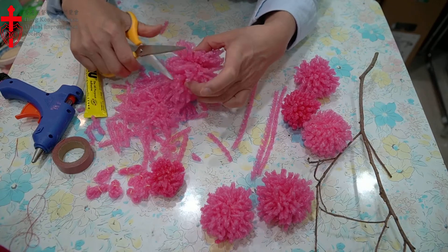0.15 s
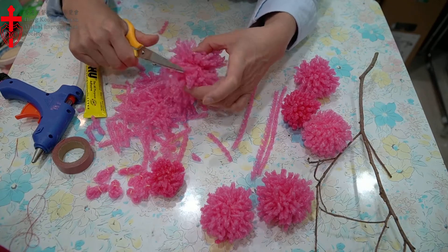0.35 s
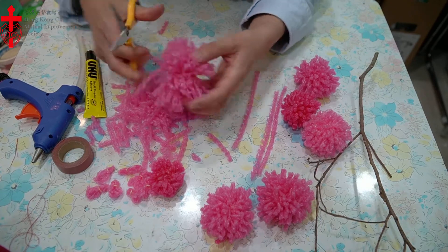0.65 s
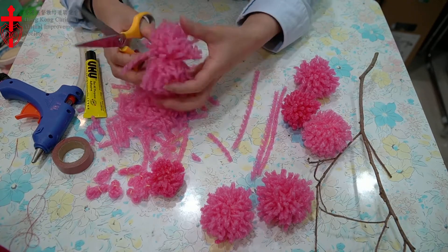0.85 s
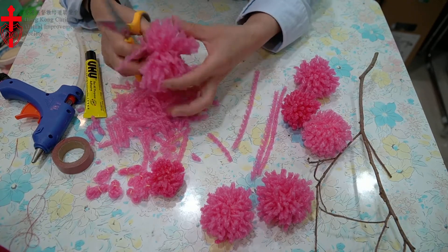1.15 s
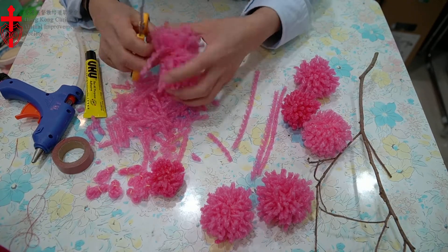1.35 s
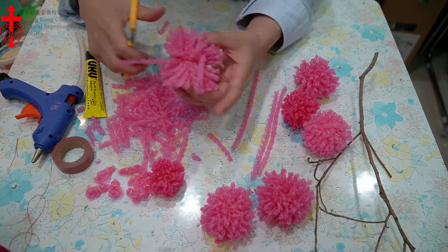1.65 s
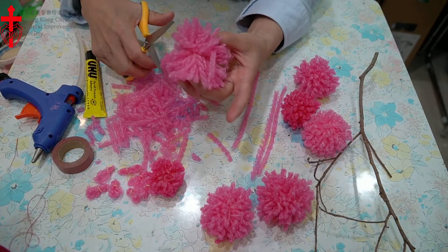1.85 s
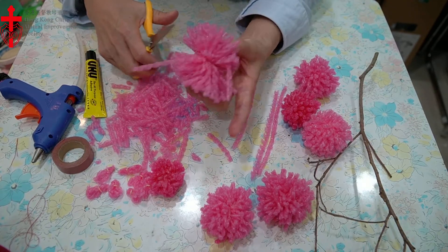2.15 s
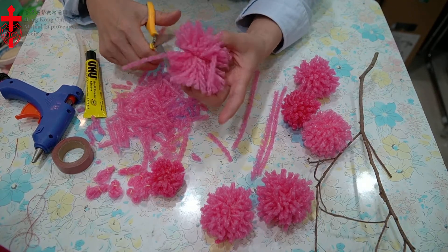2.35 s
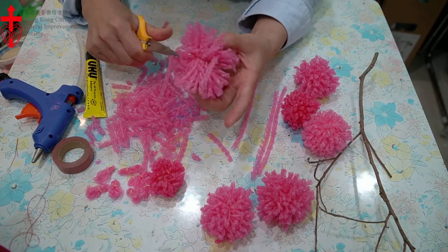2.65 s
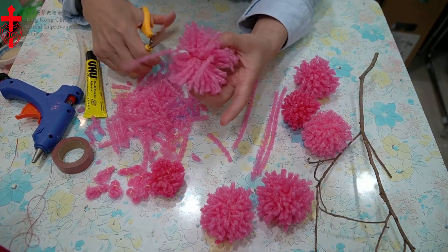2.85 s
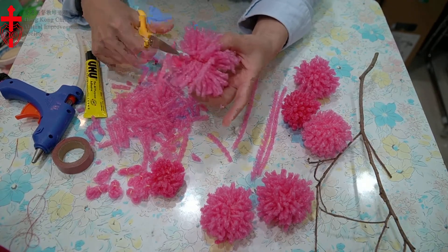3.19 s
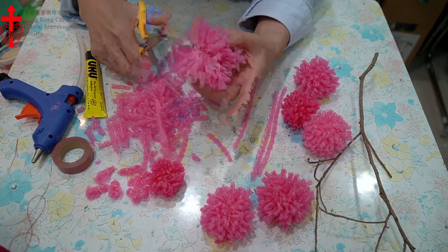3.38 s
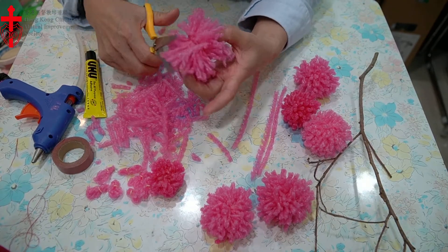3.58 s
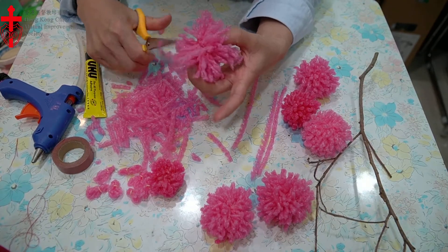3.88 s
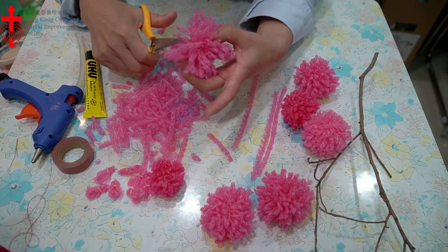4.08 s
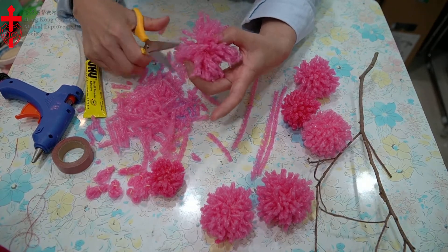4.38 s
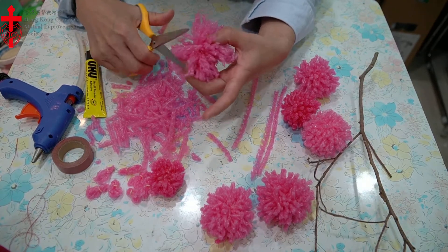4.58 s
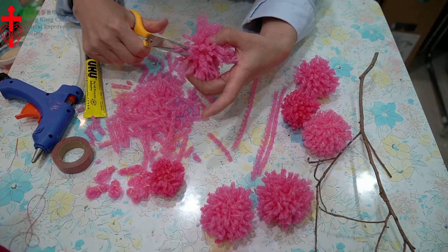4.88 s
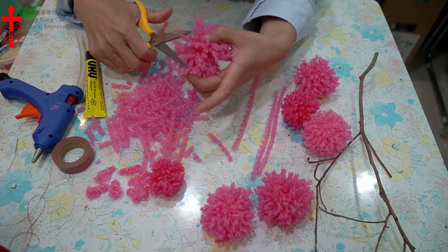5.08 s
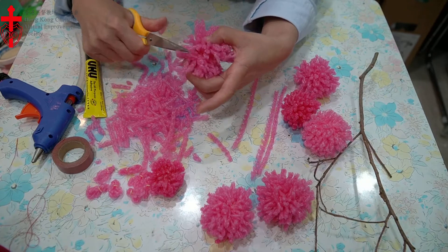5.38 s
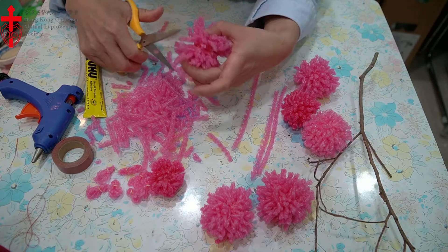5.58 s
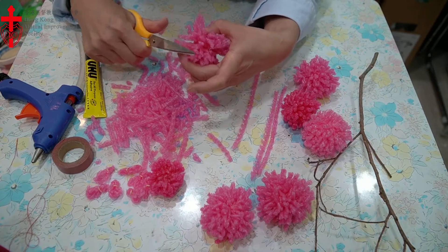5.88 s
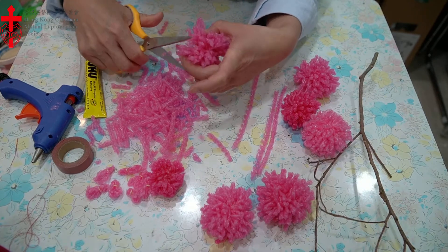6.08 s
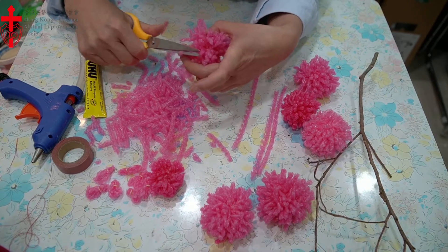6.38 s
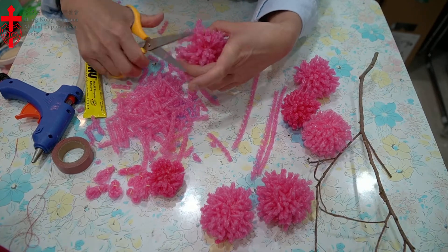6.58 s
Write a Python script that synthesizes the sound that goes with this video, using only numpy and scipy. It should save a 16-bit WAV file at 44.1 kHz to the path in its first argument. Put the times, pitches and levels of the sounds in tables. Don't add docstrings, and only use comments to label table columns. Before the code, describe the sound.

Small scissors snip crisply through yarn close up, plastic handles clacking now and then, over a steady low fan hum in a small room.

```python
import sys
import numpy as np
from scipy import signal
from scipy.fft import rfft, irfft
from scipy.io import wavfile
from scipy.ndimage import uniform_filter1d

SR = 44100
rng = np.random.default_rng(int(sys.argv[2]) if len(sys.argv) > 2 else 0)


def wav_out(sig):
    wavfile.write(sys.argv[1], SR, np.round(np.clip(np.atleast_2d(sig).T, -1, 1) * 32767).astype(np.int16))


def amplitude_ratio(level_db):
    exponent = np.asarray(level_db, float) / 20
    return 10 ** exponent


N = 297234

# pitch_hz, level_db (per Hz)
FAN_WASH = [(20, -18.5), (50, -11.5), (90, -8), (300, -11), (600, -14), (1500, -16), (2800, -21),
            (4000, -27.5), (6000, -37), (9000, -44), (16000, -46.5)]
# pitch_hz, width_hz, level_db (over the wash)
FAN_RESONANCES = [(86, 14, -8), (113, 18, 10), (218, 26, 10), (250, 15, 4), (360, 30, 11), (402, 25, 8),
                  (436, 16, 5), (490, 20, 4), (543, 27, 5), (660, 40, -4), (714, 22, 3), (797, 26, 6),
                  (960, 20, 5), (992, 18, 11), (1022, 26, 8), (1197, 44, 5), (1284, 20, 5), (1440, 40, 3),
                  (1600, 40, -6), (1685, 22, 11), (2320, 65, 4), (2605, 35, 4), (2887, 45, 4)]
# pitch_hz, likeness_0_to_1
SIDE_LIKENESS = [(60, .999), (200, .998), (400, .975), (700, .85), (1400, .76), (2800, .58), (5600, .45),
                 (12000, .55)]
# pitch_hz, left_minus_right_db
MIC_LEAN = [(60, .1), (200, .3), (550, 1.4), (1200, .9), (2200, .1), (4500, 1.2), (12000, -.2)]
# pitch_hz, t60_s
ROOM_DECAY = [(300, 0.033), (1000, 0.4), (3000, 0.23), (6000, 0.15), (12000, 0.096)]
# pitch_hz, level_db (per Hz)
YARN_TONE = [(1500, -24), (3000, 0.5), (5000, 0.5), (8000, 2), (11000, 2), (14000, -2), (16500, -2.5)]
# start_s, length_s, level_db
TURNS = [(0., 0.06, -51), (0.382, 0.27, -50.5), (.75, .13, -42.5), (0.966, .16, -44), (1.235, .09, -46),
         (1.375, .09, -41), (1.502, .22, -48.5), (1.787, .03, -57.5), (2.03, .12, -64), (2.82, .045, -52),
         (3.21, .04, -57.5), (2.352, 0.12, -48), (2.562, 0.2, -49), (2.928, 0.022, -55),
         (3.334, 0.077, -50.5), (3.56, .01, -56), (4.113, .05, -54.5), (4.312, .09, -56.5),
         (5.201, .05, -60.5), (5.97, .02, -58.5), (6.123, .03, -56.5), (6.372, .04, -51.5),
         (5.045, 0.037, -51.5), (5.52, 0.029, -51)]
# peak_s, level_db, rise_s, fall_s
CUTS = [(.161, -44, .05, .3), (.321, -32, .12, .08), (.856, -37.5, 0.11, .08), (.996, -38, 0.088, .3),
        (6.322, -32.5, .02, .016), (1.42, -39.5, .11, .16), (1.955, -46.5, 0.059, .06),
        (2.192, -49, 0.078, .1), (2.311, -46, 0.15, .6), (2.526, -35.5, 0.03, .06), (2.811, -43, 0.063, .1),
        (3.004, -47, .036, .036), (3.06, -46.5, .024, .09), (3.131, -45, .06, .11),
        (3.297, -44.5, 0.049, .1), (3.429, -45, .013, .115), (3.631, -46, 0.083, .3),
        (3.715, -36, 0.037, .12), (3.875, -44.5, .18, .165), (4.191, -41, .046, .3),
        (4.184, -33, .008, .02), (5.287, -32.5, 0.0057, .025), (5.851, -33.5, .012, .015),
        (5.322, -32.5, .04, .075), (5.466, -43, 0.031, .1), (5.863, -35.5, 0.04, .07),
        (6.025, -53.5, 0.18, .34), (6.318, -41.5, .07, .22), (6.514, -44, 0.21, .094),
        (6.708, -56, .04, .08)]
# pitch_hz, level_db, t60_s
HANDLE_MODES = [(1850, -10, .015), (2120, -8, .015), (2320, -4, .02), (2610, 0, .022), (2760, -1, .022),
                (2900, 0, .022), (3200, -4, .016), (3520, -7, .013), (4150, -10, .01), (4900, -11, .012),
                (5600, -13, .014), (7500, -15, .012)]
# pitch_hz, level_db, t60_s
PALM_MODES = [(215, 0, .07), (320, 2, .07), (460, -2, .07), (545, 1, .06), (610, -1, .05), (1130, -9, .04)]
# start_s, peak_db, thud_db, crack_db, lower_modes_db
CLACKS = [
    (1.7616, -24.5, 0.5, -32, 8),
    (3.4175, -10.5, -12.5, -9, -3),
    (3.7017, -33, -18, -4, 12),
    (3.98, -23.5, -7, -14, 5),
    (4.2372, -21, -12, -3.5, -10),
    (5.2849, -39.5, 6, 9.5, 18),
    (5.537, -15.5, -5, -4, 7),
    (6.3184, -37, 0, 8.5, 16),
]
# start_s, peak_db
FIBRES = [(0.2583, -44), (0.2935, -42.5), (0.5278, -38.5), (0.5718, -39), (0.6574, -40), (1.0414, -40),
          (1.2565, -38), (1.465, -42), (1.679, -42.5), (1.74, -39.5), (1.9461, -40), (2.094, -46),
          (2.253, -40), (2.4708, -40.5), (2.4984, -36.5), (3.0481, -42), (3.6333, -42), (3.697, -36.5),
          (3.8703, -40), (5.0332, -46.5), (5.0604, -45.5), (5.0847, -46.5), (5.1032, -44), (5.2647, -39.5),
          (5.4531, -42), (5.7764, -48.5), (6.0091, -47), (6.109, -43), (6.4043, -41), (6.7004, -44.5)]
# start_s, peak_db, top_db
THIN_STRANDS = [(.125, -38, .5), (.1483, -34, 1), (.164, -30.5, -1), (.1853, -31.5, -5),
                (0.215, -35.5, -1.5), (.2304, -35, 3.5), (.246, -35, -3.5), (.323, -30, 4),
                (.3591, -39, -2), (0.5114, -38, 3), (.5201, -40, 1), (0.606, -35, -1), (.8666, -42, 1),
                (0.885, -38, -9), (1.3113, -36, 3.5), (1.448, -34, 1.5), (2.3757, -41, -4),
                (2.6026, -32.5, 4), (2.7393, -42.5, 5.5), (2.8003, -31, -5.5), (3.122, -34, 4),
                (3.8386, -36.5, 5), (3.8789, -40.5, 9.5), (3.9107, -36, 1), (3.9557, -39, 3.5),
                (4.1837, -31, -2.5), (5.824, -35, 0), (6.281, -36.5, 0), (6.3136, -30, 8), (6.5149, -36, 1)]
# start_s, peak_db, low_db, top_db
THICK_STRANDS = [(.0474, -40.5, 6, -6.5), (.135, -36.5, 0, -2.5), (.2717, -23, -5, -1.5),
                 (.3093, -21, -4.5, 1), (.3307, -26.5, 0.5, -5), (.994, -36.5, -2.5, -5),
                 (1.0674, -34.5, 0, -5.5), (2.3267, -34, -16.5, 7.5), (2.5146, -22.5, -9.5, 8.5),
                 (2.52, -30.5, -6, 9.5), (2.8083, -38.5, 5.5, -1), (3.1571, -34, 4.5, -6.5),
                 (3.2833, -39, 3, -4), (3.7033, -23, -5.5, -8), (3.7192, -26, -5, 15.5),
                 (4.1895, -30.5, 1.5, -7), (4.211, -31, 1, -7), (4.2363, -26.5, -12, -2.5),
                 (4.239, -25, -3, -7), (5.285, -32.5, -4.5, 0.5), (5.29, -26.5, -11, 7.5),
                 (5.2977, -34, 6.5, 4.5), (5.3213, -20, -4, -4), (5.3297, -27.5, -17, 13),
                 (5.5382, -32.5, 11, -11.5), (5.8532, -29.5, -3.5, -1), (5.873, -29, -4.5, 4),
                 (5.9084, -40.5, 4.5, -9.5), (6.3215, -25.5, -2.5, 0.5), (6.5072, -32.5, -12.5, 17)]
# start_s, end_s
DROPOUT = (4.4628, 5.0199)

FAN_DB = -35
TURN_EDGE_DB_PER_S, CUT_DROP_DB, STILL_DB = 250.5, 20, -75
CRACKLES_PER_S, CRACKLE_DB, CRACKLE_SPREAD_DB = 26, -42.5, -1
THIN_LOW_DB, FIBRE_LOW_DB, FIBRE_TOP_DB = -17, -13, .8
BREAK_DB_PER_DB = 1.3
PAN_DB, PAN_PER_LOW_DB = 1.8, .1
CLACK_ROOM_DB, CUT_ROOM_DB = 1.6, -12
CHATTER_DB, CHATTER_T60_S = -4.5, 0.017
EDGE_HZ, BURST_EDGE_HZ, BURST_DB = 15760, 16550, -27


def evened(x):
    return x / np.sqrt(np.mean(x ** 2) + 1e-20)


def read(points, hz):
    f, value = np.transpose(points)
    return np.interp(np.log(hz + 1), np.log(f + 1), value)


def add(mix, start_s, sound):
    part = mix[:, round(start_s * SR):][:, :sound.shape[1]]
    part += sound[:, :part.shape[1]]


def band(x, low_hz, high_hz):
    sos = signal.butter(2, [low_hz, min(high_hz, SR * .45)], "band", fs=SR, output="sos")
    return signal.sosfilt(sos, x)


def pair(gain, same, size):
    a, b, c, d = rng.standard_normal(gain.T.shape + (4,)).T
    same = np.clip(same, 0, 1)
    left = a + 1j * b
    right = same * left + np.sqrt(1 - same ** 2) * (c + 1j * d)
    z = gain * np.array([left, right])
    return signal.istft(z, nperseg=size, noverlap=size * 3 // 4)[1][:, :N]


def fan():
    hz, frames = np.fft.rfftfreq(8192, 1 / SR), N // 2048 + 5
    lift = 1
    for pitch_hz, width_hz, level_db in FAN_RESONANCES:
        lift = lift + (amplitude_ratio(level_db) ** 2 - 1) / (1 + (2 * (hz - pitch_hz) / width_hz) ** 2) ** 2
    patches = evened(uniform_filter1d(rng.standard_normal((frames, len(hz))), 40, axis=1)).T
    ripple = evened(uniform_filter1d(rng.standard_normal((len(hz), 1)), size=4, axis=0))
    ripple_db = 1.2 * (hz > 1300)[:, None] * ripple
    steady = amplitude_ratio(read(FAN_WASH, hz)) * np.sqrt(np.maximum(lift, .1))
    gain = steady[:, None] * amplitude_ratio(0.53 * patches + ripple_db)
    return amplitude_ratio(FAN_DB) * evened(pair(gain, read(SIDE_LIKENESS, hz)[:, None], size=8192))


def room(x):
    taps = np.zeros((2, SR // 2))
    at = np.arange(100, SR // 2 - 20, 20) + rng.integers(0, 20, (2, (SR // 2 - 101) // 20))
    np.put_along_axis(taps, at, rng.choice([-1., 1.], at.shape), 1)
    hz, t, z = signal.stft(taps, SR, nperseg=256)
    tail = signal.istft(z * amplitude_ratio(-60 * t / read(ROOM_DECAY, hz)[:, None]), SR, nperseg=256)[1]
    hz = np.fft.rfftfreq(SR, 1 / SR)
    left, right = rfft(tail, SR)
    same = read(SIDE_LIKENESS, hz)
    z = np.array([left, same * left + np.sqrt(1 - same ** 2) * right])
    z *= np.sqrt(read(ROOM_DECAY, hz) / uniform_filter1d(abs(z) ** 2, size=160))
    tail = irfft(z, SR)[:, :SR // 2]
    return signal.fftconvolve(x.mean(0)[None], tail / np.linalg.norm(tail[0]), axes=1)[:, :N]


def force(t):
    levels = []
    for peak_s, level_db, rise_s, fall_s in CUTS:
        away = np.where(t < peak_s, (peak_s - t) / rise_s, (t - peak_s) / fall_s)
        levels.append(level_db - CUT_DROP_DB * away)
    for start_s, length_s, level_db in TURNS:
        outside_s = np.maximum(np.maximum(start_s - t, t - start_s - length_s), 0)
        levels.append(level_db - TURN_EDGE_DB_PER_S * outside_s)
    return np.maximum(np.max(levels, axis=0), STILL_DB)


def rustle():
    hz, frames = np.fft.rfftfreq(128, 1 / SR), N // 32 + 5
    frame_s = np.arange(frames) * 32 / SR
    force_db = force(frame_s)
    flicker = np.minimum(rng.exponential(1, frames), 4)
    clumps = np.clip(evened(uniform_filter1d(rng.standard_normal(frames), size=10)), -1, 1)
    patches = uniform_filter1d(rng.standard_normal((frames, 65)), 30, axis=0)
    patches = evened(uniform_filter1d(patches, 10, axis=1)).T
    crunch_db = 0.13 * np.maximum(force_db + 61.0, 0) * (hz < 5200)[:, None]
    tone_db = read(YARN_TONE, hz)[:, None]
    gain = amplitude_ratio(tone_db + 0.54 * flicker + 2.6 * clumps + 1.1 * patches + crunch_db)
    level_db = np.interp(np.arange(N) / SR, frame_s, force_db) - 0.7
    return amplitude_ratio(level_db) * evened(pair(gain, 0.5, size=128))


def ring(modes, detune):
    t = np.arange(SR // 8) / SR
    waves = 0
    for k, ((pitch_hz, level_db, t60_s), d) in enumerate(zip(modes, detune)):
        waves = waves + (-1) ** k * amplitude_ratio(level_db - 60 * t / t60_s) * np.sin(2 * np.pi * pitch_hz * d * t)
    return waves * (1 - np.exp(-t / 0.00016))


def clacks():
    direct, send = np.zeros((2, 2, N))
    detune = 1 + .012 * rng.standard_normal((len(CLACKS), 12))
    t = np.arange(SR // 8) / SR
    cracks = band(rng.standard_normal((len(CLACKS), len(t))) * amplitude_ratio(-60 * t / 0.018), 1300, 5100)
    chatters = band(rng.standard_normal((len(CLACKS), len(t))) * amplitude_ratio(-60 * t / CHATTER_T60_S), 2200, 4200)
    hz, db, t60_s = np.transpose(HANDLE_MODES)
    for (start_s, peak_db, thud_db, crack_db, lower_db), d, crack, chatter in zip(CLACKS, detune, cracks, chatters):
        struck_db = db + lower_db * (hz < 2500) + (crack_db + 8) * (hz > 4000)
        handles = ring(np.transpose([hz, struck_db, t60_s]), d)
        thud = amplitude_ratio(thud_db) * ring(PALM_MODES, d[::-1])
        noise = amplitude_ratio(crack_db + 10.0) * crack + amplitude_ratio(CHATTER_DB) * chatter
        blow = amplitude_ratio(peak_db - 6.5) * (handles + thud + noise)
        add(direct, start_s, blow * amplitude_ratio(np.array([[.6], [-.6]])))
        add(send, start_s, np.tile(blow * amplitude_ratio(CLACK_ROOM_DB), (2, 1)))
    return direct, send


def crackle():
    rows = []
    for start_s, length_s, level_db in TURNS:
        after_s = np.cumsum(rng.exponential(1, 16)) / CRACKLES_PER_S
        for a, (u, v) in zip(after_s, rng.standard_normal((16, 2))):
            if a < length_s:
                peak_db = min(CRACKLE_DB, level_db + 3) + CRACKLE_SPREAD_DB * u
                rows.append((start_s + a, peak_db, FIBRE_LOW_DB, 4.5 * v))
    return rows


def snap_band(burst, low_hz, high_hz):
    x = band(burst, low_hz, high_hz)
    return x / np.sqrt(np.mean(x[:, 30:90] ** 2))


def snaps():
    out, t = np.zeros((2, N)), np.arange(-44, 2000) / SR
    strands = list(THICK_STRANDS)
    strands += [(start_s, db, THIN_LOW_DB, top_db) for start_s, db, top_db in THIN_STRANDS]
    strands += [(start_s, db, FIBRE_LOW_DB, FIBRE_TOP_DB) for start_s, db in FIBRES]
    strands += crackle()
    noise = rng.standard_normal((len(strands), 3, len(t)))
    shape = amplitude_ratio(-60 * np.where(t > 0, t / 0.011, -t / 0.0028))
    for (start_s, peak_db, low_db, top_db), (both, left, right) in zip(strands, noise):
        burst = (both + 0.65 * np.array([left, right])) * shape
        burst[:, np.argmax(shape)] += 4.5 * amplitude_ratio(BREAK_DB_PER_DB * max(peak_db + 25, 0))
        low = snap_band(burst, 1700, 4800)
        middle = snap_band(burst, 5400, 11430)
        top = snap_band(burst, 9500, 16300)
        high = (middle + amplitude_ratio(top_db - 1.5) * top) / np.hypot(1, amplitude_ratio(top_db))
        pan_db = PAN_DB + PAN_PER_LOW_DB * low_db
        side_db = np.array([[pan_db], [-pan_db]]) / 2
        add(out, start_s + t[0], amplitude_ratio(peak_db + 3.5 + side_db) * (high + amplitude_ratio(low_db - 3.0) * low))
    return out


def scene():
    strands = snaps()
    handles, send = clacks()
    return fan() + rustle() + strands + handles + room(send + amplitude_ratio(CUT_ROOM_DB) * strands)


def top_cut(x):
    return signal.sosfilt(signal.butter(12, 16990, fs=SR, output="sos"), x)


def record(dry):
    hz, t = np.fft.rfftfreq(N, 1 / SR), np.arange(N) / SR
    lean_db = read(MIC_LEAN, hz)
    z = rfft(dry) * amplitude_ratio(np.array([lean_db, -lean_db]) / 2)
    x = irfft(z * (hz < EDGE_HZ), N)
    top = irfft(z * (hz >= EDGE_HZ) * (hz < BURST_EDGE_HZ), N)
    loud = uniform_filter1d(band(x.mean(0), 5000, 15000) ** 2, size=88) > amplitude_ratio(BURST_DB) ** 2
    x = x + top * np.minimum(uniform_filter1d(loud * 9., size=300), 1)
    heard = (t < DROPOUT[0]) | (t > DROPOUT[1])
    return top_cut(x * heard)


dry = scene()
out = record(dry)
wav_out(out)
```